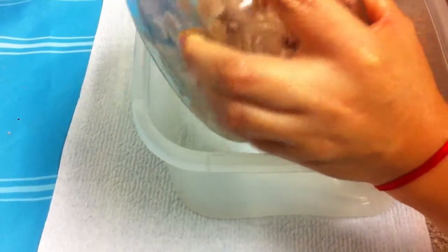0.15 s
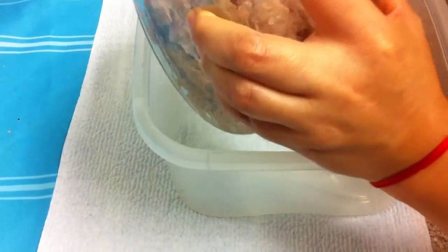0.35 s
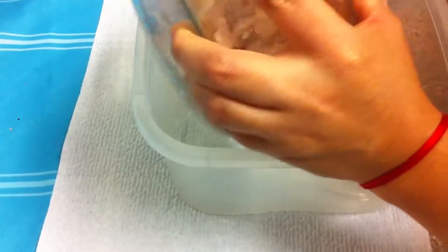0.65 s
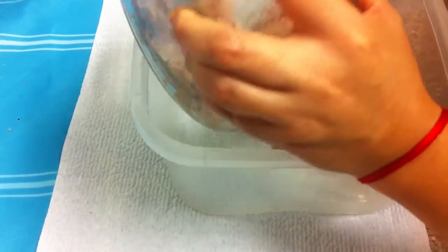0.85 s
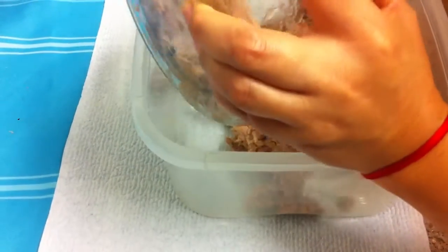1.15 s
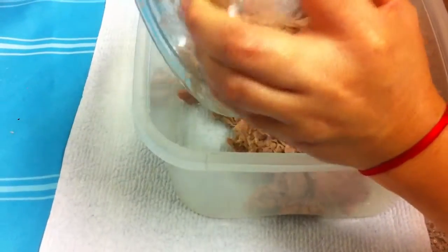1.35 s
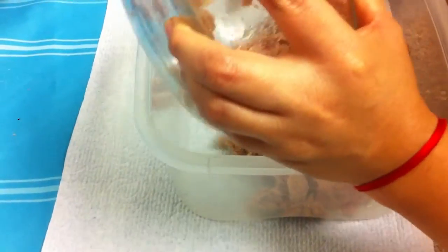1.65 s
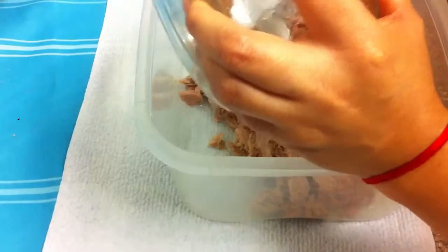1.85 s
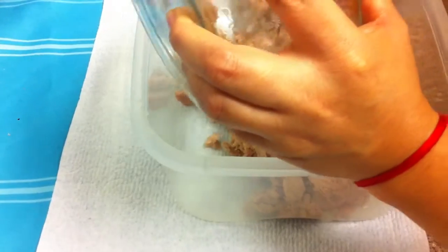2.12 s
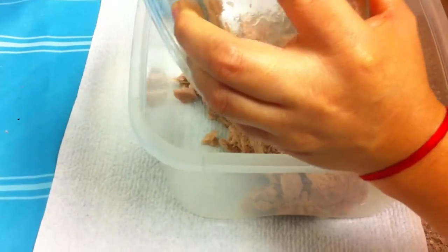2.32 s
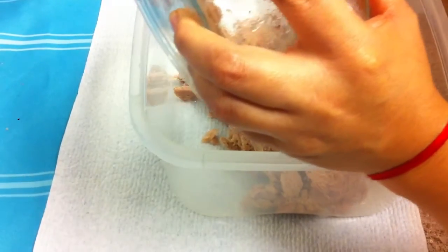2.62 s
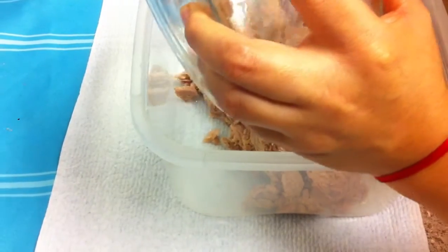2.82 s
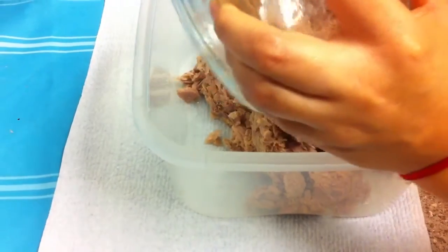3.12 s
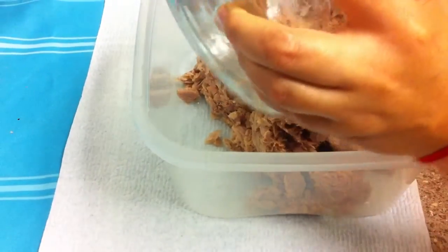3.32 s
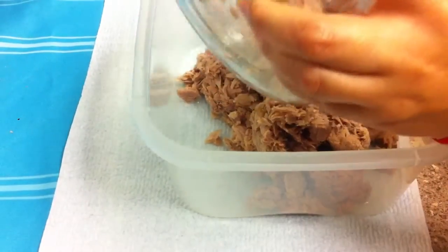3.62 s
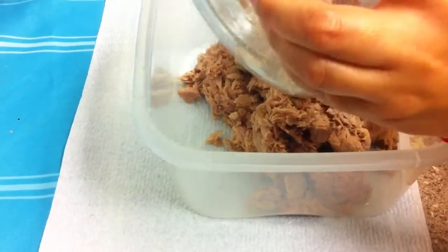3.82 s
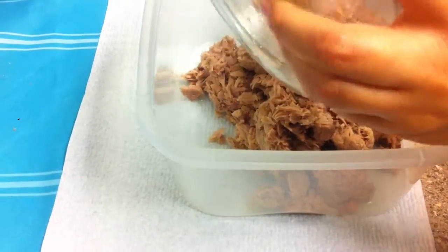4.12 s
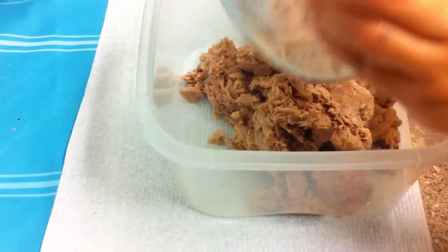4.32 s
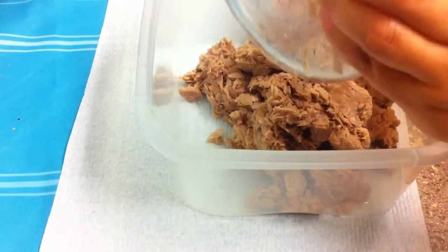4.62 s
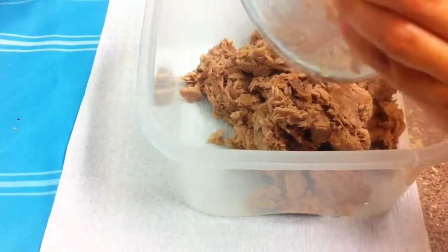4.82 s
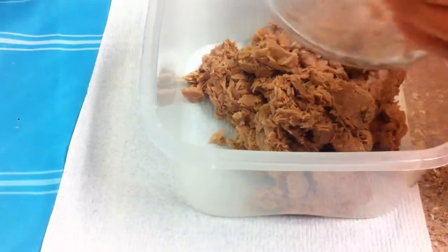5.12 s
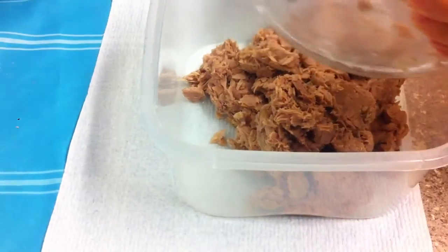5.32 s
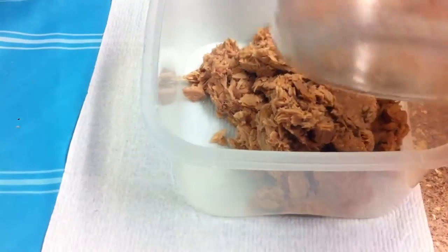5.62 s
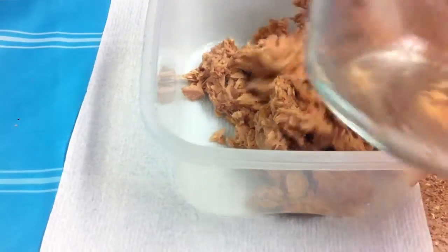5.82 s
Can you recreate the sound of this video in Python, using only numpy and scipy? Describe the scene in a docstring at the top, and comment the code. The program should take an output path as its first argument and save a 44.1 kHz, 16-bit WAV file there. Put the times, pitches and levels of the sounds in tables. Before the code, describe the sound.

Soft lumps of wet food drop into a plastic tub, then hard, short glass-on-plastic knocks and tiny squeaks follow close up.

```python
"""A hand-held glass bowl is knocked on the rim of a plastic tub to shake moist food out, close to the microphone.
Each clink is a set of quickly damped glass modes over a burst of plastic clack. Between blows the glass
squeaks and skids along the rim in stick-slip pulses, lumps plop into the tub through its resonances, and
food smears and crackles as sticky grains. A small kitchen answers with early reflections and a tail,
over filtered noise for the air and wandering sines for the hum of an appliance."""
import sys
import numpy as np
from scipy import signal
from scipy.fft import rfft, irfft
from scipy.io import wavfile

SR = 44100
rng = np.random.default_rng(int(sys.argv[2]) if len(sys.argv) > 2 else 0)


def persist_wave(psi):
    """Save psi, clipped to +-1, as 16-bit WAV."""
    counts = np.round(np.clip(psi, -1, 1) * 32767).astype(np.int16)
    wavfile.write(sys.argv[1], SR, np.atleast_2d(counts).T)


N = 262836
TIME = np.arange(N) / SR
HIT_TIME = TIME[:SR // 4]  # every short event is rendered in a quarter of a second


def undb(db):
    """Decibels to gain."""
    return 10 ** (np.asarray(db) / 20)


def unit(x):
    """Scale to rms 1."""
    return x / np.sqrt(np.mean(x ** 2))


def add(out, start_s, x):
    """Mix x into out from start_s."""
    i = int(start_s * SR)
    out[i:i + len(x)] += x[:N - i]


def fade(t, t60, hold=0):
    """Level that holds for hold seconds, then falls 60 dB in t60 seconds."""
    return np.exp(-np.log(1000) * np.maximum(t - hold, 0) / t60)


def noise(points, size):
    """Noise of rms 1 with a spectrum of (Hz, dB) points, joined along log frequency."""
    hz, db = np.transpose(points)
    bins = np.maximum(np.fft.rfftfreq(size, 1 / SR), 1)
    spectrum = undb(np.interp(np.log(bins), np.log(hz), db))
    return unit(irfft(rfft(rng.standard_normal(size)) * spectrum, size))


def resonate(x, hz, width):
    """One resonance, gain 1 at its centre."""
    return signal.lfilter(*signal.iirpeak(hz, hz / width, fs=SR), x)


def bandpass(x, low_hz, high_hz):
    """Third-order band-pass, as stable second-order sections."""
    return signal.sosfilt(signal.butter(3, [low_hz, high_hz], "band", fs=SR, output="sos"), x)


def balance(x, edges, levels_db):
    """Split a hit into registers and give each its level over the first 25 ms."""
    out = 0
    for low_hz, high_hz, db in zip(edges, edges[1:], levels_db):
        band = bandpass(x, low_hz, high_hz)
        out = out + undb(db) * band / np.std(band[:SR // 40])
    return out


# Spectrum of the air. Each row: frequency in Hz, relative level in dB.
AIR_SPECTRUM = [(25, -36), (70, -25), (100, -14), (150, 1), (200, -2.5), (280, 2.5), (390, -4.5), (500, 0),
                (800, -5.5), (2000, -12.5), (3000, -21.5), (6500, -22.5), (11000, -32), (16000, -30.5)]
# Partials of the appliance hum. Each row: frequency in Hz, level in dB at the average of the course below.
HUM_PARTIALS = [(120, -69), (160.3, -60.5), (241, -69.5), (271, -66), (482, -64)]
# Course of the background, before the air's own trim. Each row: time in seconds, level in dB.
BACKGROUND_COURSE = [(0.0, -56), (0.48, -55), (0.78, -54.5), (2.71, -56), (3.25, -55.5), (4.2, -55),
                     (5.04, -58.5), (5.31, -57), (5.58, -61), (5.96, -59.5)]


def background(air_trim_db=1.0, drift=.3):
    """Soft rush of air and the hum of an appliance, whose phases wander slowly; both follow one level."""
    course_db = np.interp(TIME, *np.transpose(BACKGROUND_COURSE))
    air = undb(course_db + air_trim_db) * noise(AIR_SPECTRUM, N)
    hum = 0
    for hz, db in HUM_PARTIALS:
        wander = drift * np.cumsum(rng.standard_normal(N)) / np.sqrt(SR)  # random walk in cycles
        hum = hum + undb(db) * unit(np.sin(2 * np.pi * (hz * TIME + wander)))
    return air + undb(course_db - course_db.mean()) * hum


# Send to the room: more of the clink reaches it as the bowl is lifted clear of the tub.
# Each row: time in seconds, send level in dB.
ROOM_SEND = [(2.8, -8.5), (3.1, -2.5), (4.3, -4), (4.8, -1.5)]


def kitchen(x, tail_db=-18, first_s=.007, tail_t60=0.5, early_db=-9.0, early_t60=0.19):
    """Quick bright reflections off the counter and cupboards, with a longer, duller tail."""
    t = TIME[:SR]
    early = noise([(1000, 1.0), (8000, -1.4), (16000, 0.46)], SR) * fade(t, early_t60)
    tail = noise([(100, -6.0), (1000, 0.5), (5000, -2.0), (9000, -4.0), (16000, -13)], SR) * fade(t, tail_t60)
    response = (undb(early_db) * unit(early) + undb(tail_db) * unit(tail)) / np.sqrt(SR)
    send = x * undb(np.interp(TIME, *np.transpose(ROOM_SEND)))
    out = x.copy()
    add(out, first_s, signal.fftconvolve(send, response))
    return out


def crackle(clicks_per_s=90, spread_db=10.0, db=-71):
    """Tiny sticky clicks as the food peels off the glass, dying out as the bowl empties."""
    peeling = np.interp(TIME, [0, .5, .8, 1.6, 2.2, 4.5], [.1, .3, 1.5, 1.2, .5, 0])  # factor on the rate
    strength = undb(spread_db * np.minimum(rng.exponential(size=N), 2))
    clicks = (rng.random(N) < clicks_per_s * peeling / SR) * strength
    bursts = signal.fftconvolve(clicks, fade(HIT_TIME, .025))[:N]
    sticky = noise([(500, -15.0), (1800, 6.0), (6500, -3.0), (15000, -8.5)], N)
    return undb(db) * unit(bursts * sticky)


# Moist food smearing down the glass. Each row: start in seconds, length in seconds, level in dB.
SMEAR_EVENTS = [(1.451, 0.17, -61), (3.709, 0.076, -50.5)]
# Spectrum of one smeared grain. Each row: frequency in Hz, relative level in dB.
SMEAR_SPECTRUM = [(200, -16), (900, 7.5), (2500, -8), (4500, -13), (7000, -15.5), (15000, -32.5)]


def smears(grains_per_s=600):
    """Food sliding on glass: a soft swell of dense sticky grains."""
    out, t = np.zeros(N), HIT_TIME
    for start_s, length, db in SMEAR_EVENTS:
        clicks = (rng.random(len(t)) < grains_per_s / SR) * rng.standard_normal(len(t))
        grain = noise(SMEAR_SPECTRUM, len(t)) * fade(t, 0.011)
        grains = unit(signal.fftconvolve(clicks, grain)[:len(t)])
        swell = np.sin(np.pi * np.minimum(t / length, 1))
        add(out, start_s, undb(db) * grains * swell)
    return out


# Lumps of food landing in the tub. Each row: start in seconds, base level in dB, wetness in dB.
LUMP_EVENTS = [(0.6707, -53.5, -3), (0.758, -39, -4), (.83, -66.5, 7.5), (.94, -48.5, -12.5),
               (1.504, -60.5, 4.5), (1.954, -85, 14)]
# Edges in Hz of the three registers of a lump: thud, slap and splat.
LUMP_REGISTER_EDGES = [135, 900, 4500, 12000]
# Thud, slap and splat. Each row: level in dB against the base level, dB gained per dB of wetness.
LUMP_REGISTERS = [(-1, -0.78), (2.5, 0.96), (-18, 2.6)]
# Floor of the tub under a soft lump. Each row: frequency in Hz, width in Hz, level in dB.
TUB_RESONANCES = [(164, 47, -7), (320, 65, -4.5), (570, 85, -15), (768, 140, -13.5), (1086, 130, -14.5),
                  (1890, 400, -10.5), (3470, 570, -21), (6040, 830, -15)]


def lumps(push_t60=0.19, smack_db=9, smack_t60=0.036):
    """A moist lump smacks and pushes grainily on the floor of the tub; the wetter, the more it splats."""
    out, t = np.zeros(N), HIT_TIME
    for start_s, level_db, wet_db in LUMP_EVENTS:
        grains = rng.standard_normal(len(t)) * rng.random(len(t))
        push = grains * (fade(t, push_t60) + undb(smack_db) * fade(t, smack_t60))
        plop = sum(undb(db) * resonate(push, hz, width) for hz, width, db in TUB_RESONANCES)
        registers_db = [level_db + db + share * wet_db for db, share in LUMP_REGISTERS]
        add(out, start_s, balance(plop, LUMP_REGISTER_EDGES, registers_db))
    return out


# Modes of the glass bowl in the hand. Each row: frequency in Hz, t60 in seconds at a looseness of 1,
# level in dB when touched near the lip, level in dB when touched on the flank.
BOWL_MODES = [(985, .03, -30, -14), (1095, .04, -17, -17), (1146, .11, -8, -21), (1862, .06, -19, -18),
              (2130, .055, -18, -26), (2340, .045, -12, -24), (2446, .048, 1, -25), (2815, .035, -23, -26),
              (3741, .03, -17, -16), (3995, .035, -22, -7), (4125, .058, -1, -16), (4190, .055, -14, 0),
              (4420, .04, -20, -14), (4610, .05, -16, -23), (5520, .035, -24, -20), (6185, .04, -11, -30),
              (6255, .055, -2, -26), (7062, .035, -24, -9), (7172, .06, -28, -4), (7900, .04, -22, -32),
              (8745, .055, -14, -40), (9610, .05, -19, -6), (10680, .05, -22, -27), (10980, .05, -30, -19),
              (11760, .055, -17, -24), (14400, .05, -34, -24), (15420, .055, -22, -17)]


def bowl_modes(flank):
    """(Hz, t60, gain) of the bowl when touched somewhere between lip (0) and flank (1)."""
    modes = []
    for hz, t60, lip_db, flank_db in BOWL_MODES:
        modes.append((hz, t60, undb(np.interp(flank, [0, 1], [lip_db, flank_db]))))
    return modes


# Dense, short clack of the plastic tub. Each row: frequency in Hz, relative level in dB.
CLACK_SPECTRUM = [(70, -33), (200, -14), (650, -12), (1080, -3), (1500, -11), (2180, -1), (3050, -10),
                  (3900, 1), (5100, -10), (6600, -7), (8000, -16), (11500, -11), (13000, -19), (15500, -13)]


def rub(length, peak, slips_per_s, rough, squeak_hz, flank, ring_db, grit_db, squeak_spread,
        scatter_db=2.15, speeding=0.3, soft_hz=4500):
    """Stick-slip pulses swell, ease off and speed up slightly; they ring rim and glass and rattle the tub."""
    t = HIT_TIME
    chance = rng.standard_normal((100, 2))  # per slip: uneven timing, uneven strength
    when = np.cumsum(np.exp(rough * chance[:, 0])) / slips_per_s
    when = when / (1 + speeding * (when / length - 1) / 2) - when[0] / 2
    on = (when > 0) & (when < length)
    pressure = np.interp(when[on] / length, [0, np.clip(peak, .05, .95), 1], [.25, 1, .25])
    slips = np.zeros(len(t))
    slips[(when[on] * SR).astype(int)] = np.sqrt(pressure) * undb(scatter_db * chance[on, 1])
    slips = signal.lfilter(*signal.butter(1, soft_hz, fs=SR), slips)  # the plastic yields, rounding each slip
    squeak = bandpass(slips, squeak_hz / (1 + squeak_spread), squeak_hz * (1 + squeak_spread))
    glass = 0
    for hz, t60, gain in bowl_modes(flank):
        width = np.log(1000) / (np.pi * t60)
        glass = glass + gain * t60 * resonate(slips, hz, width)  # t60 evens out how hard each mode starts
    grit = signal.fftconvolve(slips, noise(CLACK_SPECTRUM, len(t)) * fade(t, 0.019))[:len(t)]
    mix = unit(squeak) + undb(ring_db) * unit(glass) + undb(grit_db) * unit(grit)
    return np.sqrt(length / t[-1]) * mix  # level counts over the rub alone, not the silence after it


# The glass sticks and slips along the rim. Each row: start in seconds, length in seconds, level in dB,
# basic slip rate per second, pitch in Hz, share of the length where it is loudest, flank share 0-1.
SQUEAK_EVENTS = [(2.3813, 0.0115, -33, 275, 2375, 0.42, 0.12), (2.395, 0.012, -37, 300, 2260, 0.27, 0.2),
                 (2.8005, 0.011, -46, 510, 2197, .4, 0), (2.802, .009, -44, 600, 3760, .4, 0.05),
                 (3.492, 0.033, -43.5, 400, 2190, .45, 0.1), (3.562, 0.006, -38, 450, 2460, 0.41, 0.6),
                 (3.571, 0.015, -36.5, 420, 2400, .5, 0.93), (3.59, 0.047, -35, 380, 2270, 0.6, .8),
                 (3.634, 0.029, -33.5, 290, 2380, 0.6, 0.3), (3.655, .011, -41, 440, 2360, 0.28, 0.6),
                 (4.089, .04, -45, 600, 2100, 0.67, 0.96), (4.364, 0.027, -49, 440, 2150, .3, .1),
                 (4.394, 0.02, -35, 420, 2154, 0.36, .3), (4.566, 0.04, -50, 760, 2280, 0.55, 0),
                 (4.603, 0.022, -39.5, 600, 2230, 0.85, 0.06), (4.848, 0.04, -45, 480, 2250, 0.46, 0.1),
                 (5.275, 0.038, -50.5, 740, 2150, 0.55, 0.2), (5.562, 0.045, -41.5, 530, 2120, 0.55, 0.16)]
# The glass skids roughly over the rim after a blow.
# Each row: start in seconds, length in seconds, level in dB, flank share 0-1.
SKID_EVENTS = [(3.062, 0.041, -45, 0.9), (3.641, 0.028, -49, 1), (4.074, 0.054, -38, 1),
               (5.584, 0.024, -42.5, 0.16)]


def rubs():
    """Slow even slips squeak in short spurts; fast uneven ones rasp and make the glass sing."""
    out = np.zeros(N)
    for start_s, length, db, rate, hz, peak, flank in SQUEAK_EVENTS:
        squeak = rub(length, peak, rate, rough=.06, squeak_hz=hz, flank=flank,
                     ring_db=-21.5, grit_db=-16, squeak_spread=.11)
        add(out, start_s, undb(db) * squeak)
    for start_s, length, db, flank in SKID_EVENTS:
        skid = rub(length, peak=0.2, slips_per_s=820, rough=.3, squeak_hz=3840, flank=flank,
                   ring_db=-2.5, grit_db=-8.5, squeak_spread=0.19)
        add(out, start_s, undb(db) * skid)
    return out


# Blows and rebounds of the bowl on the rim. Each row: start in seconds, base level in dB, flank share 0-1,
# brightness in dB per octave, contact in ms, chatter in ms, firmness (extra clack) in dB,
# body near 2.3 kHz in dB, ring near 4 kHz in dB, pitch sag under the pressure in Hz (negative starts sharp),
# looseness as a factor on the ring length (long in a loose grip).
KNOCK_EVENTS = [(1.0177, -49, 0.3, -11, 0.23, 4, 14, 1, -1, 0, 0.82),
                (1.05, -16, 0.02, -1, .036, 4, 1, 0.5, -1.5, 50, 1.06),
                (2.2964, -18.5, 0.16, 1.4, .034, 3.7, -2.5, 1.5, 0.5, -11, 1.04),
                (2.377, -38, 0.04, 2.5, 0.073, 2.1, -3.5, 6, 2.5, 2, 0.49),
                (2.704, -11, 0, 4.5, 0.17, 3, -4.5, -1.5, 0.5, -5.5, 0.9),
                (2.8008, -37, 0, 8, 0.32, 4.9, 13, 0, 0, 62.5, 0.94),
                (2.8401, -49, 0.2, -2.5, 0.1, 6.8, -10, 7, -7, -22, 1.5),
                (3.0459, -21, 1, 2, 0.15, 3.5, -1, 0, -1, 19, 0.6),
                (3.106, -43.5, 0.97, 4, 0.19, 9.2, -2, 5.5, 7, -38, 2),
                (3.518, -24, 0.63, -5, .042, 1.7, -5.5, 2.5, -3, 12, 0.49),
                (4.0168, -19, 0.99, 0, 0.13, 2, -2.5, -4.5, 1, -15.5, 0.85),
                (4.133, -38, 0.88, 2.5, 0.17, 4.5, -14.5, 3.5, 3.5, 11.5, 1.1),
                (4.3257, -13, 0.02, -1.5, 0.047, 2.5, -2.5, 1.5, 4.5, 56.5, 0.76),
                (4.394, -32, .55, -1, 0.028, 3.3, 9, 0, -1.5, -1.5, 1.5),
                (4.415, -32.5, 0.71, -1, 0.12, 2, 11.5, 6.5, 2.5, -9, 1.7),
                (4.581, -51.5, 0, 6.5, .1, 1.5, 1, -7.5, 2.5, -2.5, 1.1),
                (4.598, -47, 0.04, 5.5, 0.14, 1.5, 0, -5, -6.5, 0, 1.1),
                (4.621, -28.5, 0.05, 4.5, 0.17, 4, 0, -8.5, -3.5, 3, 0.52),
                (4.8117, -11.5, 0.08, 4.5, 0.14, 4.8, -1, -3, 2, 1.5, 0.87),
                (5.1531, -13, 0.03, 6, 0.13, 5.4, -0.5, 0, 3, -10, 0.89),
                (5.4736, -11, 0, 11, 0.19, 4, -1, -2, 0, 16, 1.06),
                (5.304, -47.5, 0, -3, 0.14, 3, 7, -2, -1.5, 4, 0.99),
                (5.5959, -29.5, 0.03, 7, 0.18, 6.3, -5, -4.5, -12.5, -27, 0.63)]
# Edges in Hz of the seven registers of a knock, and their centres in Hz.
KNOCK_REGISTER_EDGES = [30, 850, 1600, 3100, 5200, 8000, 12300, 16000]
KNOCK_REGISTER_CENTRES = [600, 1150, 2300, 4100, 6400, 9800, 14000]
# How hard a blow drives the seven registers, low to high, in dB: near the lip, then on the flank.
LIP_DRIVE = [-34.5, -11.5, -1.5, -9.5, -9.5, -16, -25.5]
FLANK_DRIVE = [-17, -9.5, -11.5, 0, -1.5, 4, 2]
RISE_S, SAG_S = 0.00048, 0.14  # build-up time at a firmness of 0 dB; recovery time of the pitch


def knocks(clack_db=-5, clack_t60=0.047, steepness=8):
    """Glass and plastic chatter for a few ms, then bowl and tub ring down; longer contact is duller."""
    out, t, centres = np.zeros(N), HIT_TIME, np.array(KNOCK_REGISTER_CENTRES)
    octaves = np.log2(centres / 3000)
    for (start_s, db, flank, brightness_db, contact_ms, chatter_ms, firm_db,
         body_db, ring_db, sag_hz, looseness) in KNOCK_EVENTS:
        hold = chatter_ms / 1000
        hit = undb(clack_db + firm_db) * noise(CLACK_SPECTRUM, len(t)) * fade(t, clack_t60, hold)
        lost_cycles = sag_hz * SAG_S * (1 - np.exp(-t / SAG_S))
        for hz, t60, gain in bowl_modes(flank):
            grip = 1 + .0028 * rng.standard_normal()  # the gripping fingers detune each mode a little
            yielding = min(hz / 2400, 1) ** 2  # the lowest modes sag less
            cycles = hz * grip * t - yielding * lost_cycles + rng.random()
            hit += gain * np.sin(2 * np.pi * cycles) * fade(t, t60 * looseness, hold)
        # a firm blow builds up fast, a glancing one with little clack more slowly
        hit *= 1 - np.exp(-t * undb(firm_db) / RISE_S)
        place_db = (1 - flank) * np.array(LIP_DRIVE) + flank * np.array(FLANK_DRIVE)
        colour_db = np.array([0, 0, body_db, ring_db, 0, 0, 0]) + brightness_db * octaves
        cycles_in_contact = centres * contact_ms / 1000
        dulling_db = 10 * np.log10(1 + cycles_in_contact ** steepness)
        registers_db = db + place_db + colour_db - dulling_db
        add(out, start_s, balance(hit, KNOCK_REGISTER_EDGES, registers_db))
    return out


def scene():
    """Bowl, tub and food sound in the kitchen, over its background."""
    close = knocks() + rubs() + lumps() + smears() + crackle()
    return (kitchen(close) + background())[None]


def record(dry):
    """The recorder rounds only the loudest peaks and cuts the top above 16 kHz."""
    rounded = dry / (1 + dry ** 8) ** (1 / 8)
    return signal.sosfilt(signal.ellip(8, .2, 70, 16000, fs=SR, output="sos"), rounded)


dry = scene()
out = record(dry)
persist_wave(out)
```